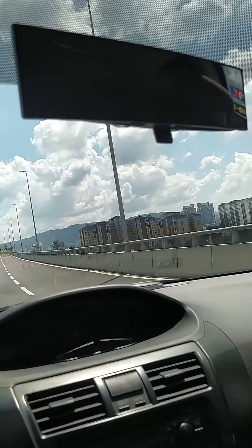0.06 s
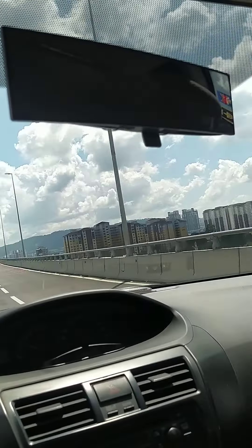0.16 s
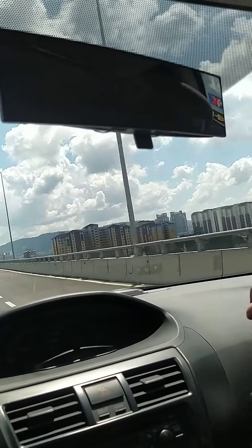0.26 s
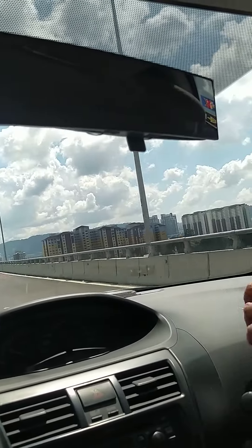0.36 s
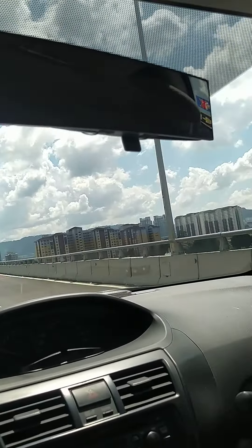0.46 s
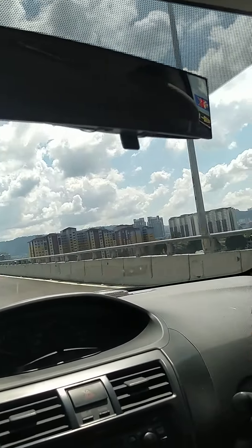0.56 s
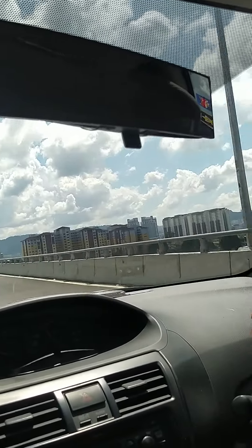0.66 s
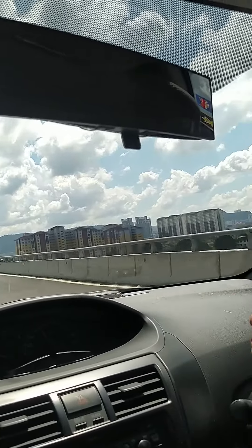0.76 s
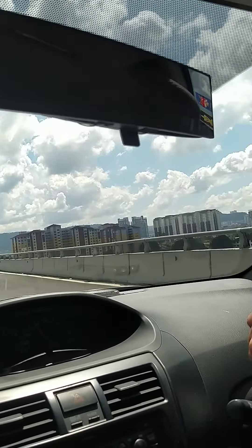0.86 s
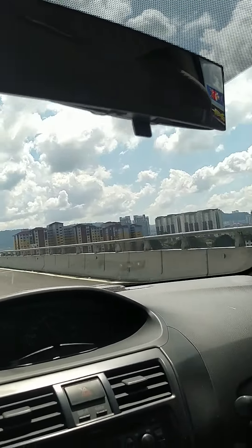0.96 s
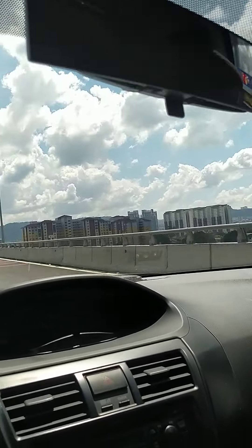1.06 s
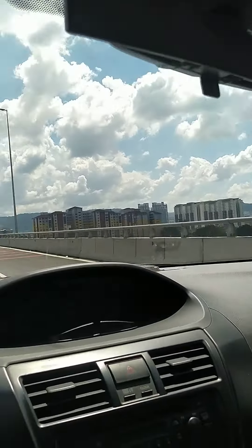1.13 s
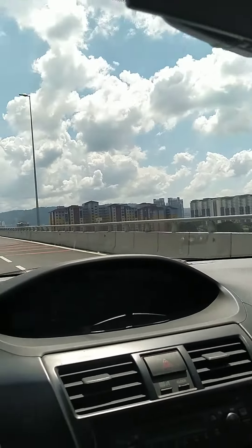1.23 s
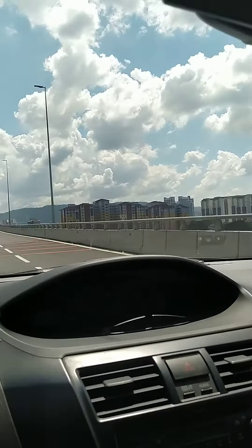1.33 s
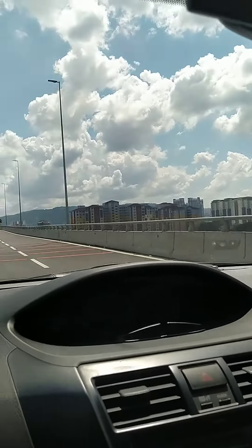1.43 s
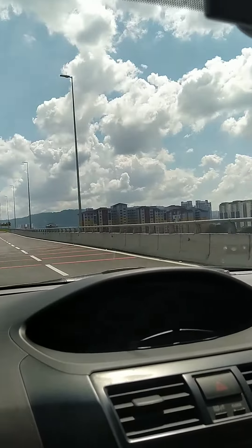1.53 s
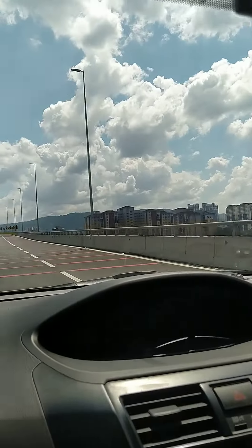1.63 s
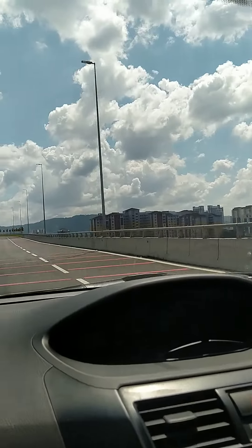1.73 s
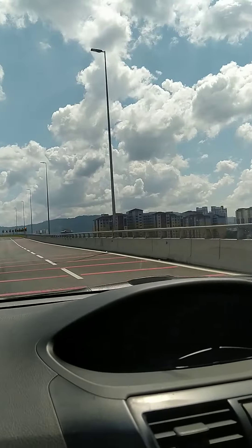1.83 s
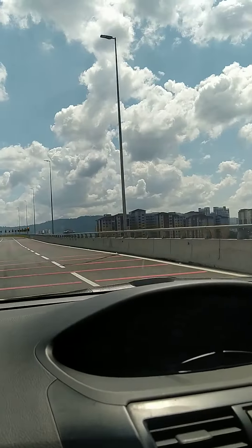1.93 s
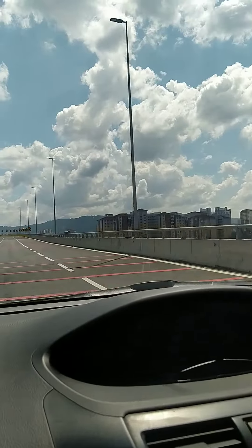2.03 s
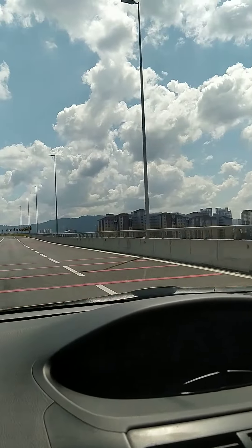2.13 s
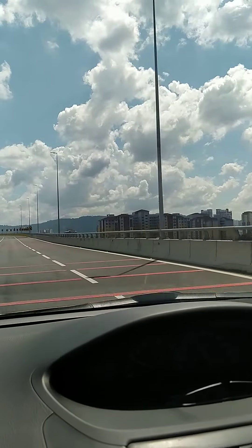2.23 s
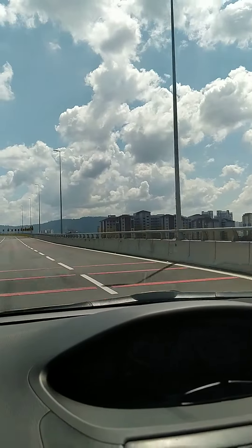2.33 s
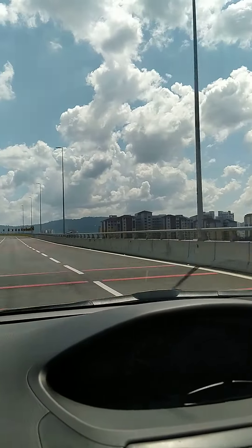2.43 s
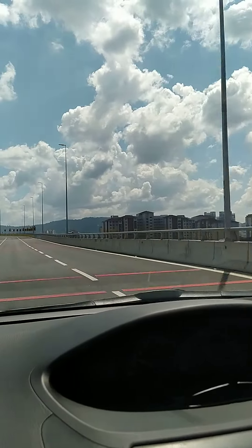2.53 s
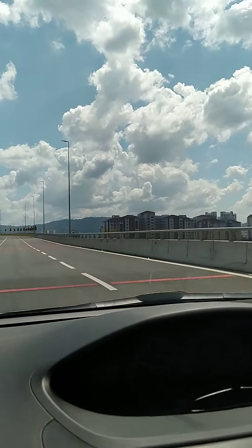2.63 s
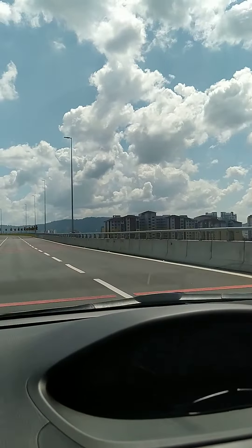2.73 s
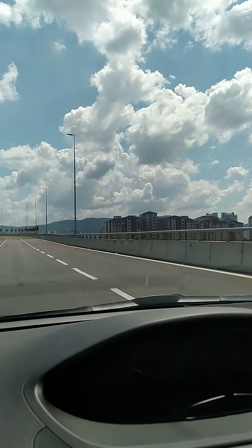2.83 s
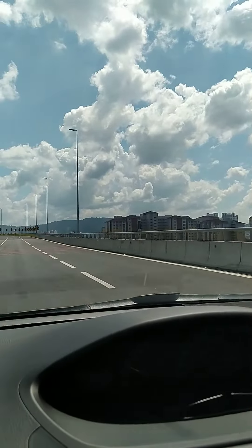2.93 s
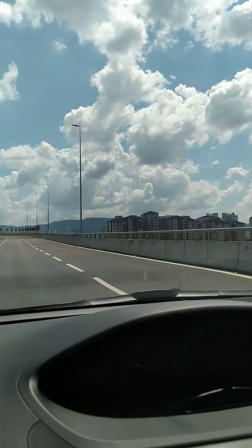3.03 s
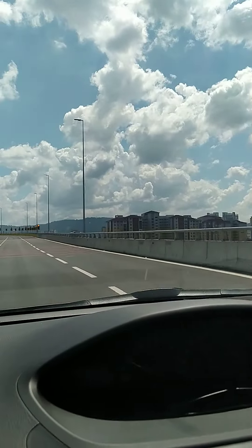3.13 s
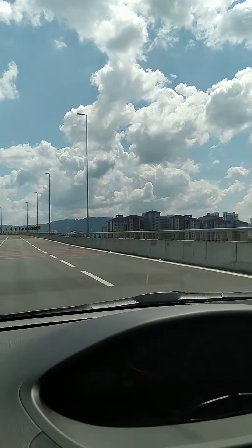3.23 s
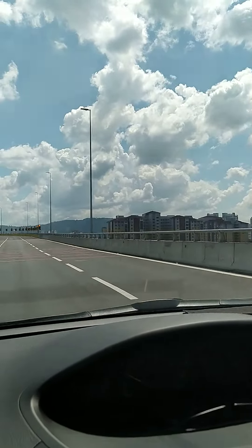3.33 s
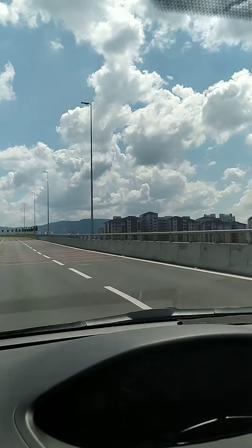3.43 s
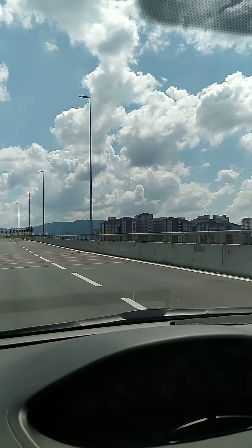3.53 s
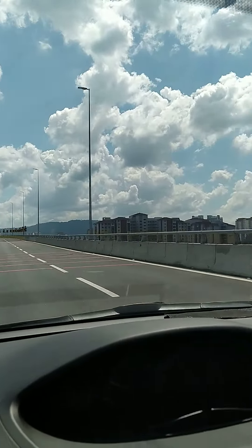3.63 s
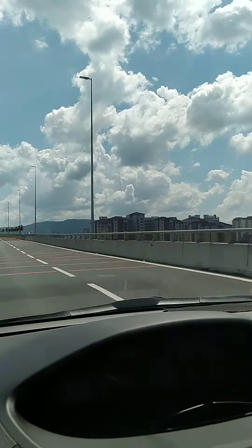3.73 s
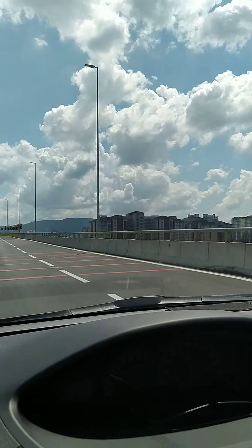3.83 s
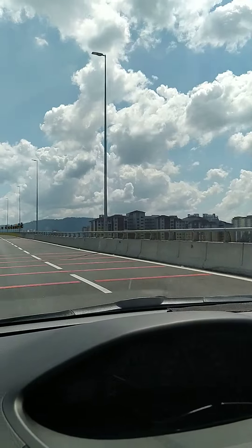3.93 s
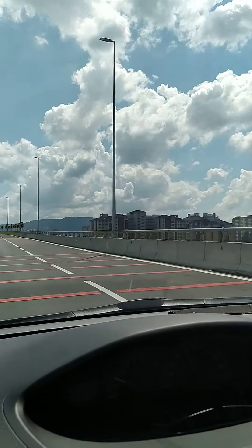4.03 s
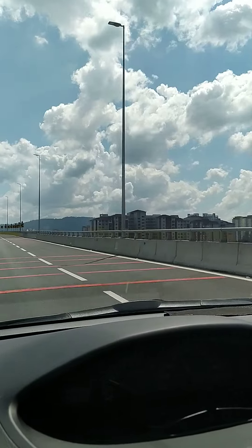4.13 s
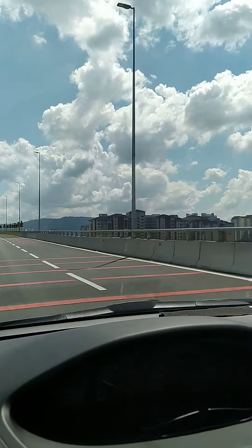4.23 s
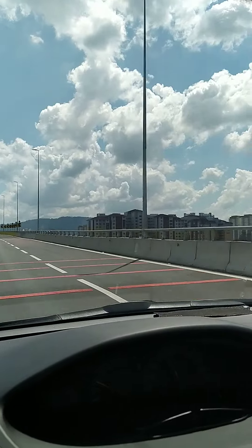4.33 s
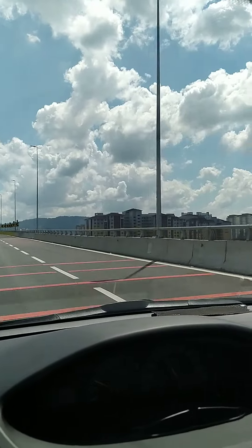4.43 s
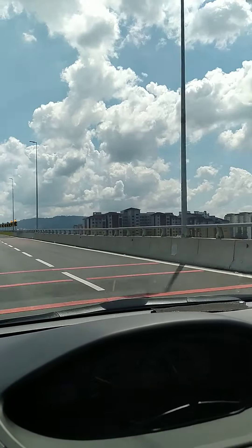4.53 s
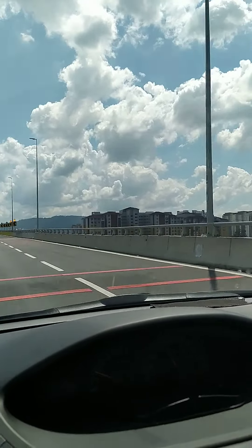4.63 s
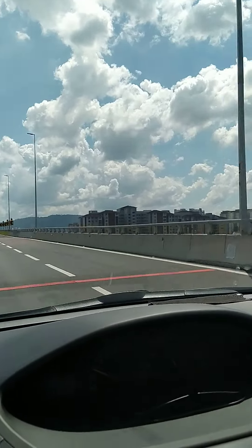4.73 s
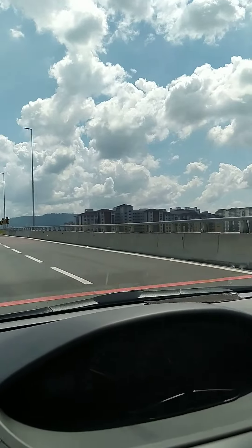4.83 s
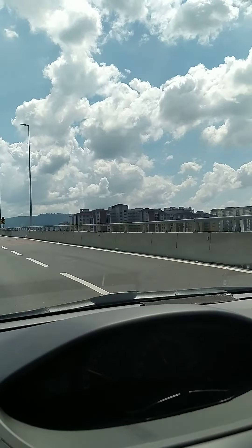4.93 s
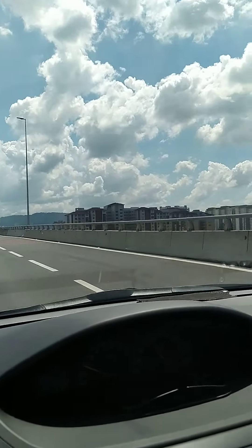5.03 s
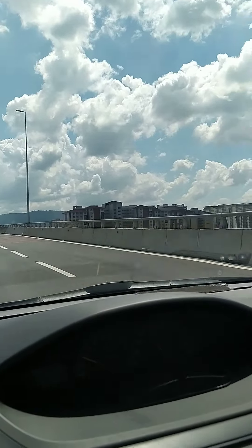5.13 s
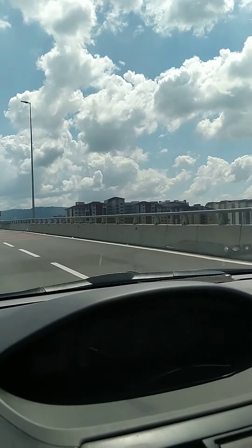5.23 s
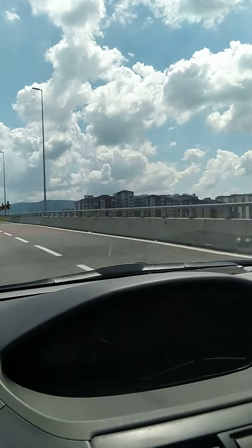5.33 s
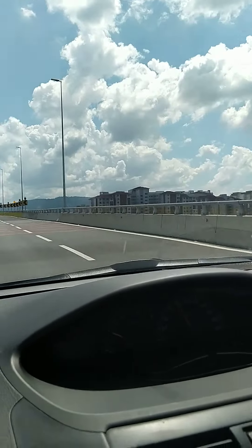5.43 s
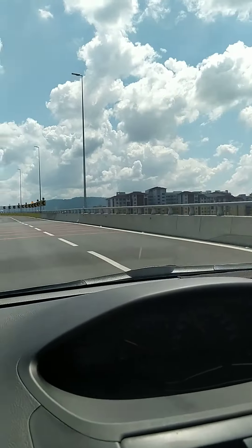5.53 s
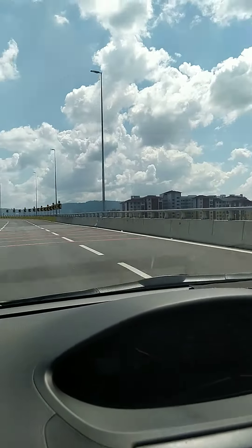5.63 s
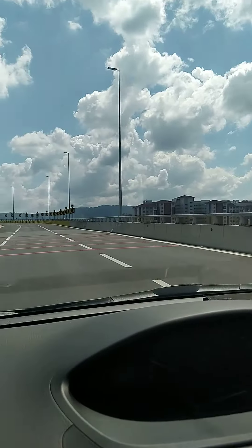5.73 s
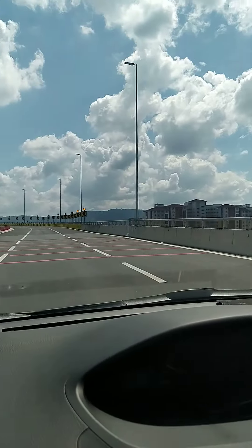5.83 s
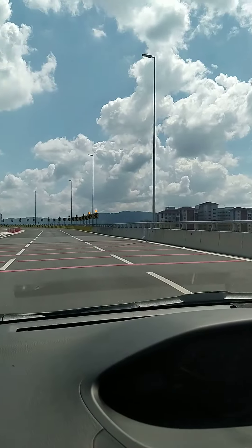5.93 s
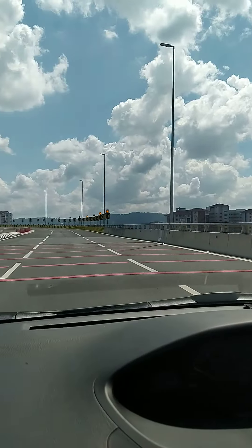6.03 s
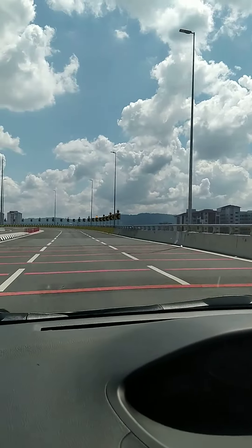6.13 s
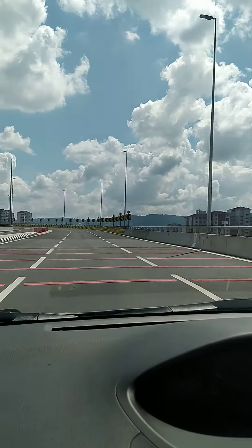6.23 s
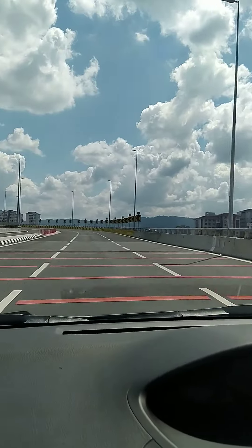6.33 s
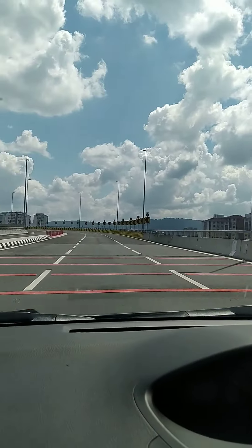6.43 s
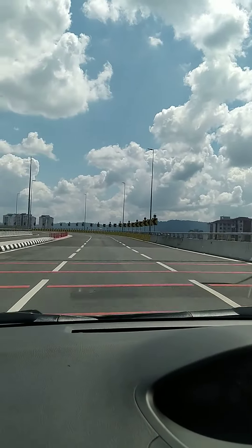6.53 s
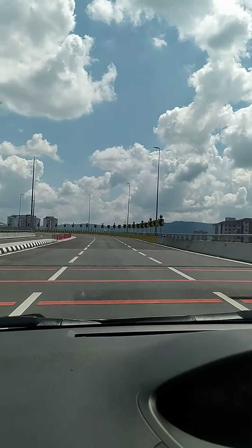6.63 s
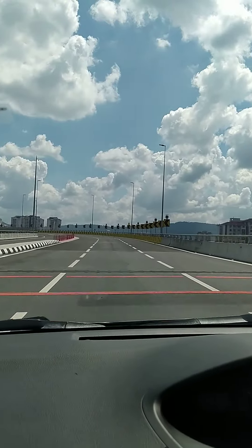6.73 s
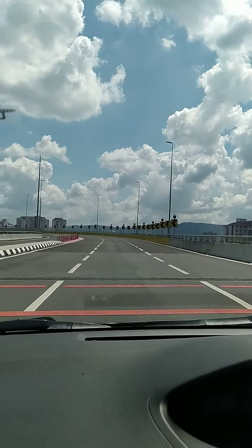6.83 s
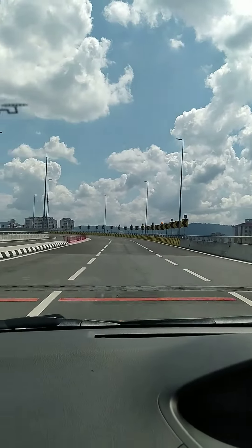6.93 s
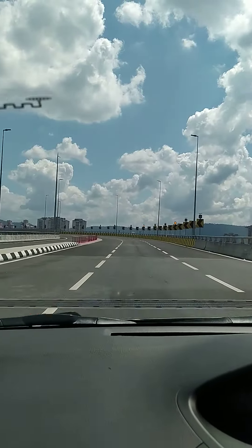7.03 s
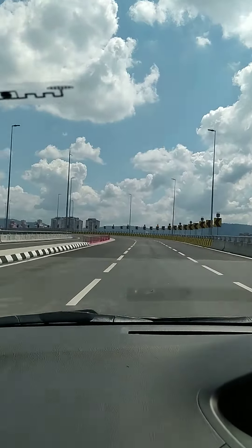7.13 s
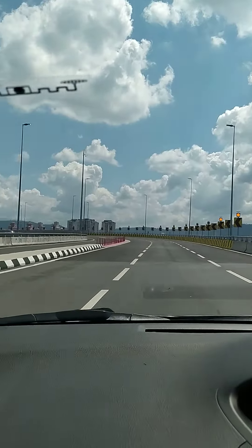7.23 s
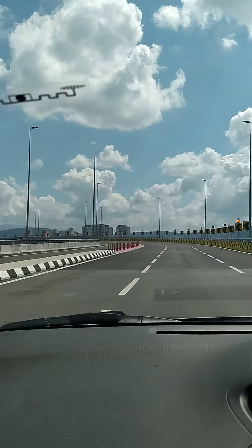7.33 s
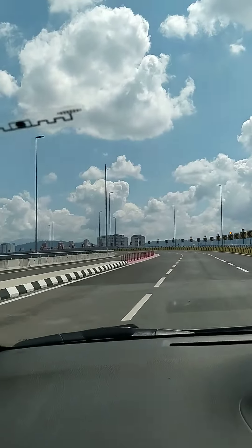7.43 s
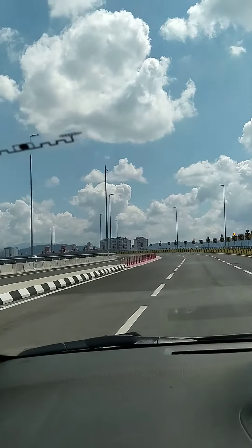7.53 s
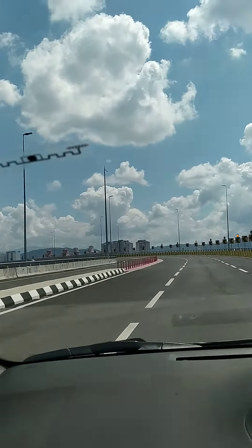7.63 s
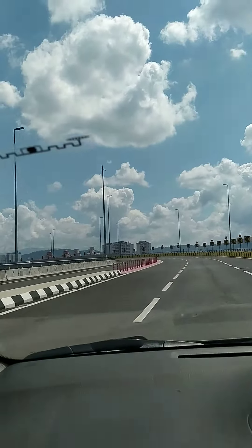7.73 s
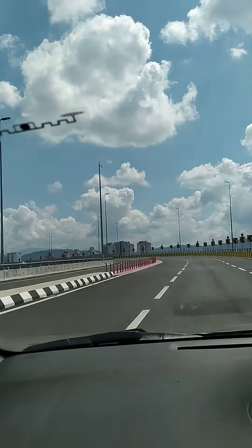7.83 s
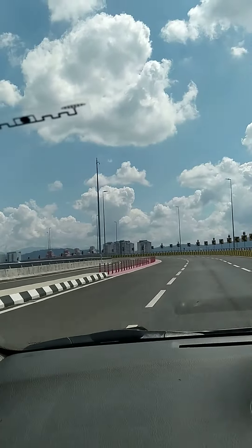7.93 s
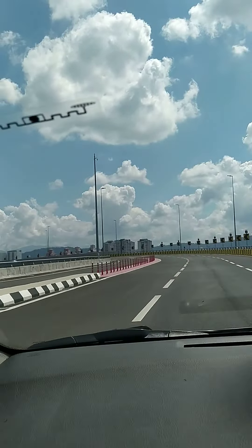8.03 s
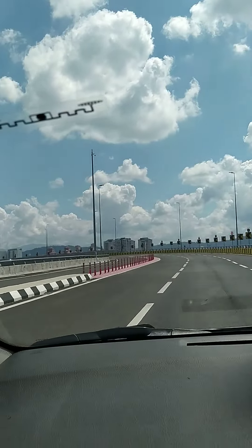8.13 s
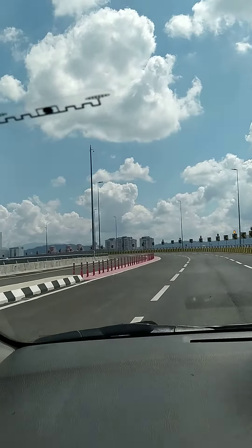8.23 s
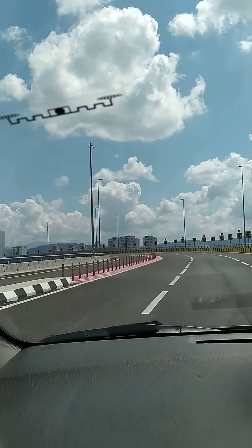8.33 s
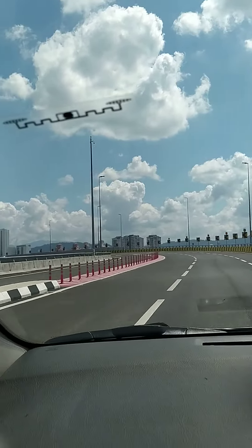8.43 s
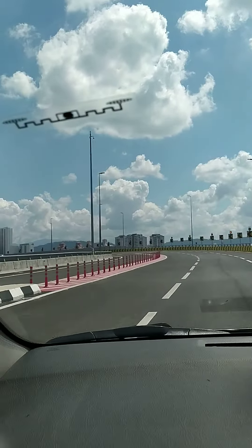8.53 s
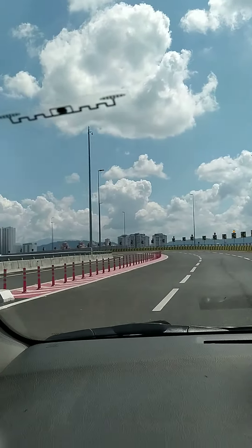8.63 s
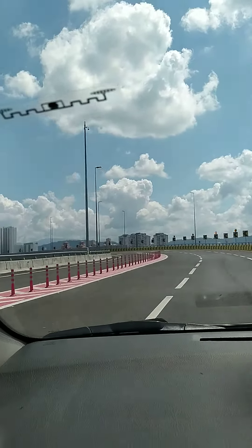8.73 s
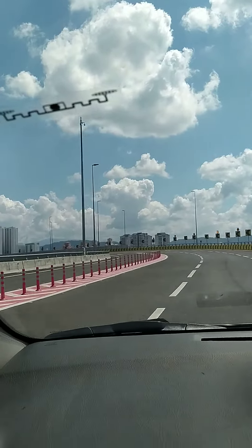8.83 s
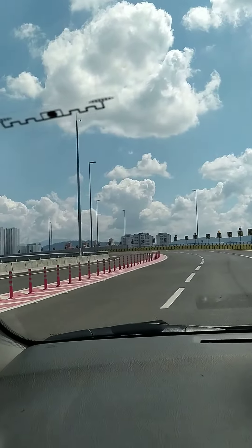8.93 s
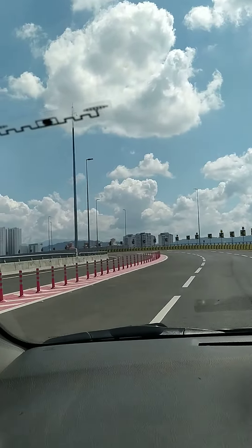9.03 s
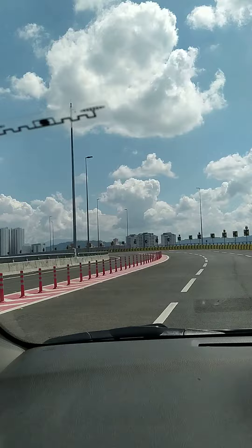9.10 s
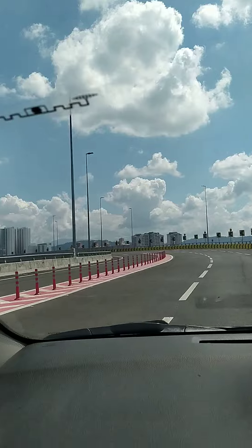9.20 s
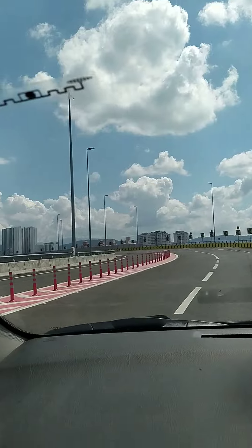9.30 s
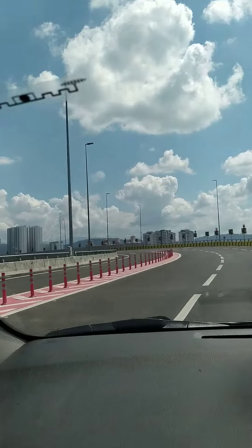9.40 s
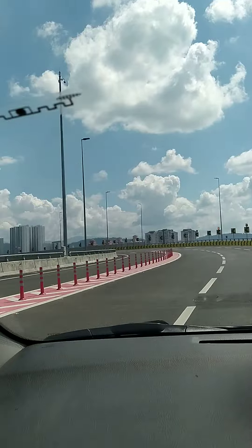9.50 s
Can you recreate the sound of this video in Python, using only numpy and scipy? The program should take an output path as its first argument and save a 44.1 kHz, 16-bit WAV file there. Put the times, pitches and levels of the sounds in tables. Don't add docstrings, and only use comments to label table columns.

```python
import sys
import numpy as np
from scipy import signal
from scipy.fft import rfft, irfft, next_fast_len
from scipy.io import wavfile
from scipy.ndimage import uniform_filter1d

SR = 44100
rng = np.random.default_rng(int(sys.argv[2]) if len(sys.argv) > 2 else 0)


def output_pcm(signal):
    pcm = np.clip(np.atleast_2d(signal).T, -1, 1) * 32767
    wavfile.write(sys.argv[1], SR, np.round(pcm).astype(np.int16))


def voltage_ratio(level):
    return 10 ** (np.asarray(level, float) / 20)


N = 421596
TIME = np.arange(N) / SR


def curve(table, column):
    rows = np.array(table)
    return voltage_ratio(np.interp(TIME, rows[:, 0], rows[:, column], left=-150, right=-150))


# (frequency [Hz], likeness [-1 to 1])
LIKENESS = [(60, 0.97), (130, 1), (290, 0.92), (640, 0.62), (1400, 0.15), (3100, 0.028), (6800, 0.1),
            (15000, -0.28)]
# (frequency [Hz], left minus right [dB])
LEAN = [(60, -0.5), (110, -1), (200, -1.0), (380, -3.5), (700, 2.5), (1290, 1.5), (2380, 1), (4400, 0.5),
        (8120, -1), (12000, -11), (15000, -18)]


def colour(spectrum, pair):
    port_lag_s = 0.00018
    size = next_fast_len(N)
    hz = np.fft.rfftfreq(size, 1 / SR)

    def at_hz(table):
        table_hz, value = np.array(table).T
        return np.interp(np.log(hz + 1), np.log(table_hz), value)

    alike = np.clip(at_hz(LIKENESS), -0.99, 0.995)
    lean = at_hz(LEAN)
    mid, side = rfft(pair, size) * voltage_ratio(at_hz(spectrum)) * np.sqrt([1 + alike, 1 - alike])
    late = np.exp(-2j * np.pi * hz * port_lag_s)
    left = (mid + side) * voltage_ratio(lean / 2) * late
    right = (mid - side) * voltage_ratio(-lean / 2)
    out = irfft(np.array([left, right]), size)[:, :N]
    return out / np.sqrt(np.mean(out ** 2))


def walk(rate):
    hold = int(SR / rate)
    steps = np.repeat(rng.standard_normal(N // hold + 1), hold)
    return 1.19 * uniform_filter1d(uniform_filter1d(steps, hold), hold)[:N]


def noise(grain_db=0., rate=3000):
    count = N // 24 + 1
    grains = np.minimum(rng.exponential(size=count), 2.5)
    grains *= rng.random(count) < rate * 24 / SR
    return rng.standard_normal((2, N)) * voltage_ratio(grain_db * np.repeat(grains, 24)[:N])


def add(out, start, shape):
    i = int(start * SR)
    out[..., i:i + shape.shape[-1]] += shape[..., :N - i]


def ring(hz, t60, rise=0., size=SR // 3):
    t = TIME[:size]
    fade = np.exp(-np.log(1000) * t / t60) * np.minimum(1, t / (rise + 1e-6))
    return fade * np.sin(2 * np.pi * hz * t) if hz else fade


def tone(hz, waver, db, flutter_db, rate):
    level = voltage_ratio(db + flutter_db * walk(rate))
    pitch = hz * (1 + waver * walk(rate))
    return level * np.sin(2 * np.pi * np.cumsum(pitch) / SR)


# (time [s], unevenness [dB], coarseness [dB])
SURFACE = [(0, -1, -2), (1, -1.5, -2.5), (1.8, -1.5, -1), (2.4, 0.5, 0.5), (3.75, 1, 1), (4.5, 0, 1),
           (5.85, 1, 1), (6.5, 0, 2.5), (7.95, -1, 0), (8.3, 1, 2.5), (8.7, 0, 6.5), (9.3, -0.2, 4),
           (9.56, 1.5, 5.5)]
# (frequency [Hz], level [dB per Hz])
RUMBLE = [(7.1, -35), (12, -2), (32, 0.5), (43, 4), (60, -3.5), (76, -8), (108, -2), (124, -3), (145, -5),
          (181, -3), (210, -7.5), (246, -6.5), (312, -15), (361, -16), (400, -17.5), (520, -39),
          (880, -120)]
ROAR = [(180, -28.5), (300, 4), (322, -15.5), (365, -2), (584, -7), (782, -9), (855, -12), (1020, -12.5),
        (1220, -15), (1660, -18), (2500, -32.5), (3250, -42), (5500, -120)]
WHOOSH = [(200, -90), (600, -12.5), (760, 2.5), (1030, -1.5), (1500, -17), (2600, -46), (5000, -120)]


def road():
    swell, coarse = walk(1.11), curve(SURFACE, 2)
    rumble_level = curve(SURFACE, 1) * voltage_ratio(-27.5 + 0.058 * swell + 0.5 * walk(4.02))
    roar_level = coarse ** 0.54 * voltage_ratio(-38.5 + 0.37 * swell + 0.5 * walk(14))
    rumble = colour(RUMBLE, noise()) * rumble_level
    roar = colour(ROAR, noise()) * roar_level
    whoosh = colour(WHOOSH, noise()) * coarse * voltage_ratio(-48)
    return rumble + roar + whoosh


# (frequency [Hz], level [dB per Hz])
HISS = [(1060, -40), (1800, -1.5), (1900, -2), (2010, -0.5), (3440, -10), (4050, -9), (5500, -13.5),
        (9700, -8), (11600, -25), (13500, -26), (14400, -41), (15000, -46), (15500, -61)]


def vent():
    return colour(HISS, noise()) * curve(SURFACE, 1) ** 0.35 * voltage_ratio(-50 + 0.19 * walk(16))


def tyre_air():
    return tone(247.6, 0.01165, -46, 3.9, 11)


# (time [s], firing rate [Hz], load [dB])
ENGINE = [
    (0, 59.33, -12),
    (.8, 61.7, -4.5),
    (1.5, 60.6, 0),
    (2.4, 62.43, 1.5),
    (3, 61.8, -19),
    (6, 61.42, -4.5),
    (8, 59.63, -2.5),
    (8.6, 58.83, 1),
    (9.56, 58.9, -4),
]
# (multiple of firing rate [-], level [dB])
ORDERS = [(1, -35), (2, -32), (3, -35), (4, -46.5), (5, -52.5)]


def engine():
    firing = np.interp(TIME, *np.array(ENGINE)[:, :2].T)
    return curve(ENGINE, 2) * sum(tone(k * firing, 0.003, db, 1.5, 5) for k, db in ORDERS)


# (time [s], pitch [Hz], level [dB])
WHINE = [(0, 799, -59), (.22, 793, -67), (.42, 780, -53), (.62, 790, -48), (.72, 792, -56), (.85, 795, -51),
         (1.4, 803, -44.5), (1.7, 803, -45.5), (1.92, 810, -47), (2.05, 802, -46), (2.4, 807, -62)]
# pitch [Hz], centre [s], half length [s], level [dB]
GEAR_MATE = (668, 1.77, .09, -49)


def gear_whine():
    pitch = np.interp(TIME, *np.array(WHINE)[:, :2].T)
    whine = curve(WHINE, 2) * tone(pitch, 0.013, 0.5, 2.5, 70)
    hz, centre, half, db = GEAR_MATE
    return whine + tone(hz, 0.006, db, 2, 30) * np.exp(-((TIME - centre) / half) ** 2)


def stroke_level(table):
    level = np.zeros(N)
    for *times, db in table:
        corners = np.c_[np.cumsum(times), db - 32 * np.array([1, 0, 0, 1])]
        level += curve(corners, 1)
    return level


# (time [s], rise [s], hold [s], fall [s], level [dB])
STROKES = [
    (0, .01, 0.26, 0.11, -52),
    (.02, .03, 0.0033, 0.027, -46),
    (0.067, 0.016, .003, 0.017, -44),
    (4.088, 0.049, 0.059, .02, -46),
]
# (time [s], rise [s], hold [s], fall [s], level [dB])
FLICKS = [
    (6.53, 0.03, 0.015, .01, -44),
    (6.571, 0.0073, 0.013, 0.034, -29.5),
    (6.603, 0.003, 0.0032, 0.017, -32),
    (7.189, 0.045, .006, 0.063, -37),
]
# (frequency [Hz], level [dB per Hz])
SLEEVE = [(1500, -40), (3000, -11), (4800, -6.5), (6300, -4), (8800, -0.5), (10200, -3), (11200, -12),
          (13800, -16), (14600, -40), (15500, -45)]
CUFF = [(1470, -45), (2500, -12), (3500, -7), (4440, -4), (5200, -14), (6300, -28), (7900, -1), (9600, 3),
        (10600, -10), (11700, -14), (12600, -30), (14900, -23), (15700, -40)]


def sleeve():
    brush = colour(SLEEVE, noise(2.1, 400)) * stroke_level(STROKES)
    return brush + colour(CUFF, noise(2.1, 400)) * stroke_level(FLICKS)


# (time [s], peak [dB], ring pitch [Hz], ring t60 [s], ring level [dB])
TICKS = [
    (0.08, -37, 1560, 0.06, -15),
    (1.0394, -47, 1500, 0.06, -17),
    (3.918, -47, 8970, .02, 6),
    (6.5304, -48, 1533, 0.093, 3),
    (6.6055, -26, 2990, 0.056, -2),
    (6.6068, -25.5, 6050, 0.015, -4),
    (6.6068, -41.5, 1550, 0.03, 6),
    (9.4163, -42, 2000, 0.013, 10),
    (9.418, -48, 1500, .02, 8),
]
# (frequency [Hz], level [dB per Hz])
SNAP = [(300, -30), (800, 0), (2510, -2), (3030, 3), (4600, -2), (5980, -7), (6820, -19), (9860, 2),
        (12000, -18), (15400, -18)]


def ticks():
    crack, ping = np.zeros((2, N))
    for start, db, hz, t60, ring_db in TICKS:
        add(crack, start, voltage_ratio(db + 4.5) * ring(0, 0.012, 0.00044))
        both = ring(hz, t60, 0.00058) + 0.2 * ring(0.72 * hz, t60 / 2, 0.0011)
        add(ping, start, voltage_ratio(db + ring_db) * both)
    return colour(SNAP, noise()) * crack + ping


# (time [s], peak [dB], ring pitch [Hz], leaving slap [dB], panel shake [dB])
SLAPS = [(2.454, -17.5, 730, -4, -25), (2.613, -19, 760, -2, -39), (2.772, -14.5, 777, -4, -30),
         (2.929, -14.5, 736, -10, -32), (3.085, -18.5, 766, -11, -24), (3.244, -24, 695, 7, -28),
         (4.546, -16.5, 738, -14, -25), (4.702, -17, 735, -20, -26), (4.86, -18, 746, -8, -27),
         (5.017, -22.5, 662, 6, -23), (5.173, -19, 727, -6, -27), (5.329, -21, 680, -12, -36),
         (6.641, -22.5, 680, -15, -25.5), (6.797, -19, 640, -4, -26), (6.951, -21, 684, 3, -25),
         (7.106, -19, 704, -8, -41), (7.264, -25, 674, -7, -33), (7.423, -29, 684, -4, -33)]
# (time [s], peak [dB], ring pitch [Hz])
THUMPS = [(2.724, -23, 800), (2.874, -27, 764), (3.195, -30, 800), (3.285, -18, 894), (3.322, -24, 860),
          (3.357, -24, 780), (3.438, -27, 740), (4.902, -21, 800), (4.941, -23, 710), (4.973, -28, 774),
          (5.351, -18, 710), (5.524, -29, 790), (7.29, -19, 740), (7.442, -23, 700), (7.498, -20, 774),
          (7.522, -25, 804), (7.568, -26, 720)]


def slaps():
    out = np.zeros((2, N))
    for start, db, hz, leave_db in [row[:4] for row in SLAPS] + [(*row, -60) for row in THUMPS]:
        left = ring(hz, 0.045, 0.00031) + 0.5 * ring(hz * 1.144, 0.038, 0.0078)
        right = 0.49 * ring(hz, 0.08, 0.00065) - 0.16 * ring(hz * 1.19, 0.11, 0.0015)
        tread = np.array([left, right])
        add(out, start, voltage_ratio(db) * tread)
        add(out, start + 0.031, voltage_ratio(db + leave_db) * tread)
    return out


RIDGES = [2.59, 2.7479, 2.9061, 3.0638, 3.2209, 3.3778, 4.6799, 4.8374, 4.9939, 5.1509, 5.307, 5.4643,
          6.7685, 6.9254, 7.0824, 7.2394, 7.3958, 7.5529]
AXLE_LAG_S, RIDGES_PER_SET = 0.1349, 6
# (frequency [Hz], level [dB per Hz])
FLOOR = [(40, -8), (62, -0.5), (76, -1), (88, -10.5), (101, 1), (135, -1.5), (155, -3), (172, -1),
         (192, 0.5), (222, -10), (244, -3), (290, -11), (400, -18), (850, -120)]
PANELS = [(180, -38), (300, -6), (414, -2.5), (519, -7), (754, -6), (825, -11.5), (917, -12), (1080, -16.5),
          (1480, -23.5), (1800, -24), (2340, -28.5), (3960, -120)]


def shudder():
    kick, hum, shake = np.zeros((3, N))
    front_panel = ring(0, 0.28, 0.01)
    rear_panel = voltage_ratio(-24.5) * ring(0, 0.71, 0.033)
    for start, slap in zip(RIDGES, SLAPS):
        add(kick, start, ring(0, 1.01, 0.027, size=SR) * voltage_ratio(0.96 * rng.standard_normal()))
        add(kick, start - AXLE_LAG_S + 0.0232, 1.35 * ring(0, 0.41, 0.0071, size=SR))
        add(hum, start + 0.041, voltage_ratio(-26.5) * ring(101, 1.5, 0.011, size=SR))
        add(shake, slap[0], (voltage_ratio(slap[-1]) * front_panel) ** 2)
        add(shake, start + 0.0017, rear_panel ** 2)
    floor = colour(FLOOR, noise()) * kick * voltage_ratio(-22.5)
    return hum + floor + colour(PANELS, noise(4.3, 300)) * np.sqrt(shake)


# (pitch [Hz], t60 [s], then signed push [-] of rear climb, rear drop,
# front climb, front drop)
BODY = [(21.3, 0.51, -0.017, -0.145, -0.072, 0.033), (27.0, 0.68, 0.007, 0.336, 0.081, -0.036),
        (38.0, 0.83, 0.171, 0.024, -0.087, -0.068), (49.7, 0.45, -0.153, -0.041, 0.036, -0.05),
        (76.0, 0.56, -0.119, 0.019, -0.007, -0.013), (89.8, 0.21, -0.085, -0.106, -0.029, -0.021),
        (106.9, 0.17, 0.172, 0.02, 0.011, -0.011), (154.0, 0.42, 0.0, -0.085, 0.011, 0.011),
        (188.8, 0.24, 0.001, 0.061, 0.051, -0.02), (241.3, 0.48, -0.003, -0.044, -0.011, -0.017)]
# (pitch [Hz], t60 [s], level [dB])
REBOUND = [(65.4, 0.55, -20.5), (101.4, 1.23, -29), (152.2, 0.36, -19), (186, 0.58, -34)]


def body():
    ridge_s, rebound_s = 0.0376, 0.12
    lags = (0, ridge_s, -AXLE_LAG_S, ridge_s - AXLE_LAG_S)
    blows = sum(np.array(push)[:, None] * ring(hz, t60, size=SR) for hz, t60, *push in BODY)
    bounce = sum(voltage_ratio(db) * ring(hz, t60, 0.02, size=SR) for hz, t60, db in REBOUND)
    out = np.zeros(N)
    for start in RIDGES:
        for blow, lag in zip(blows, lags):
            add(out, start + lag, blow * voltage_ratio(0.8 * rng.standard_normal()))
    for start in RIDGES[RIDGES_PER_SET - 1::RIDGES_PER_SET]:
        add(out, start + rebound_s, bounce)
    return out * voltage_ratio(1.37)


# (time [s], peak [dB], t60 [s], brightness [dB])
RATTLES = [(2.4787, -29, 0.28, 8), (2.6323, -10.5, 0.15, -2), (2.6528, -14, 0.087, 8.5),
           (2.6833, -22.5, 0.48, -2), (2.793, -12, 0.24, -1.5), (2.9457, -21, 0.12, 5),
           (2.963, -20.5, 0.38, -4), (3.1073, -11.5, 0.11, -3), (3.1258, -27, 0.41, 1),
           (3.265, -10, 0.15, 0), (3.2824, -10.5, 0.14, 4.5), (3.3064, -12.5, 0.21, -3),
           (3.4206, -15, 0.3, 0.5), (4.7423, -25.5, 0.21, 5.5), (4.88, -17, 0.19, -1),
           (4.898, -21, 0.41, 0), (5.041, -13, 0.18, 4), (5.0861, -27, 0.14, -3), (5.1943, -29, .18, 8),
           (5.2123, -31, 0.31, 9), (5.363, -19.5, 0.32, 3), (5.5071, -25, 0.1, 0), (5.5205, -15.5, 0.31, 0),
           (6.8147, -16.5, 0.19, 3.5), (6.982, -20.5, 0.16, 4.5), (7.1267, -14.5, 0.28, 1),
           (7.281, -16, 0.25, -1), (7.437, -11, 0.066, -9), (7.457, -19.5, 0.36, -3),
           (7.605, -20, 0.29, -0.5), (2.6, -27, .2, -6), (2.87, -36, 0.17, -6), (3.165, -32, 0.16, -2),
           (3.195, -32, 0.18, 2), (3.35, -24.5, 0.2, 2), (4.69, -30.5, .4, -2), (4.79, -32, .2, -8),
           (5.115, -33, .2, 2), (6.672, -24, .12, 0), (6.79, -23, 0.11, 3), (7.02, -32, .15, 6),
           (7.148, -26, 0.18, 8), (7.32, -32, 0.15, 4), (7.365, -30, 0.17, 5)]
# (lag [s], peak [dB], t60 [s], brightness [dB], scatter [dB])
SHIVERS = [
    (0.028, -22.5, 0.34, 5, -1),
    (0.13, -26.5, 0.15, -4, 0.9),
    (0.11, -31, 0.12, 9, -3),
]
# (frequency [Hz], level [dB per Hz])
TRIM = [(590, 0.5), (1000, 0), (1080, 0.5), (1480, 3), (1590, -1), (1900, -5.5), (2200, -0.5), (3330, -9),
        (4500, -26), (5850, -45), (9900, -120)]
BUZZ = [(2350, -26), (4000, 4), (5310, 3), (7050, 3), (9360, 6), (11200, -7.5), (13600, -21), (14800, -40),
        (15500, -34)]
# (pitch [Hz], level [dB])
TRIM_MODES = [(1490, -9.5), (1670, -29), (2130, -11), (2810, -9), (4050, -10), (6240, -18), (8130, -31),
              (8900, -7.5), (9610, -22.5), (10070, -14)]


def rattles():
    bursts = []
    for k, start in enumerate(RIDGES):
        for j, (lag, db, t60, bright_db, scatter_db) in enumerate(SHIVERS):
            lone_db = -9 * ((k + (j > 0)) % RIDGES_PER_SET == 0)
            peak_db = db + scatter_db * rng.standard_normal() + lone_db
            bursts.append((start + lag, peak_db, t60, bright_db, 0.035))
    bursts += [(*row, 0.015) for row in RATTLES]

    dull, bright, rings = np.zeros((3, 2, N))
    for start, db, t60, bright_db, rise in bursts:
        pan_db = -1.25 * rng.standard_normal() * np.array([[1], [-1]])
        gain = voltage_ratio(db + pan_db)
        burst = ring(0, max(t60, 0.02), rise) * gain
        add(dull, start - 0.6 * rise, burst * voltage_ratio(-12.0))
        add(bright, start - 0.59 * rise, burst * voltage_ratio(bright_db - 22.5))
        for (hz, mode_db), chance in zip(TRIM_MODES, rng.standard_normal((len(TRIM_MODES), 4))):
            push = gain * voltage_ratio(mode_db) * 0.67 * np.tanh(chance[:2, None])
            mode = ring(hz * (1 + 0.036 * chance[3]), 2.0 / np.sqrt(hz), 0.0045, size=2500)
            add(rings, start + 0.006 * abs(chance[2]), push * mode)
    chatter = noise(2.8, 400) * voltage_ratio(0.7 * walk(40))
    dull *= colour(TRIM, chatter) * voltage_ratio(2.43 * walk(130))
    bright *= colour(BUZZ, chatter) * voltage_ratio(2.43 * walk(130))
    return dull + bright + rings


# (time [s], peak [dB], treble minus peak [dB])
KNOCKS = [(2.614, -23, -7), (2.6325, -28, -13), (2.6524, -23, -13), (2.6833, -34, -18), (2.7122, -27.5, -9),
          (2.7646, -40, -7), (2.792, -20, 2.5), (2.8091, -19, -9), (2.8294, -32, -17), (2.9284, -31, -14),
          (2.9514, -20, -12), (2.9644, -24.5, -1), (2.9994, -35, -14), (3.034, -24, -11),
          (3.0854, -28, -16), (3.1073, -26, -13), (3.125, -18.5, -2.5), (3.1944, -36, -7), (3.243, -22, -6),
          (3.264, -22, -9), (3.29, -17, -14), (3.3069, -28, -16), (3.353, -20, -15), (3.4215, -28, -15),
          (4.7426, -42, -9), (4.8589, -34, -10), (4.8798, -24, -14), (4.8984, -18, -6), (4.9404, -38, -10),
          (4.972, -19, -15), (5.0364, -16, -9), (5.0564, -25, -14), (5.0863, -35, -13), (5.1914, -38, -10),
          (5.2106, -17, -10), (5.2764, -22, -16), (5.3293, -23, -13), (5.35, -28, -9), (5.3635, -20, -9),
          (5.5116, -20, -7), (5.5214, -22, -5), (6.789, -32, -8), (6.8154, -24, -12), (6.9431, -38, -16),
          (6.967, -23, -16), (6.9814, -18, -7), (7.041, -26, -6), (7.104, -26, -9), (7.1247, -22, -20),
          (7.2807, -19, -15), (7.369, -30, -10), (7.4175, -30, -13), (7.4365, -29, -12),
          (7.4585, -17.5, -1.5), (7.5752, -30, -17), (7.6094, -24, -12)]


def knocks():
    size, rise_s, port_lag_s = 4000, 0.006, 0.00027
    thud, dull, sharp = (colour(part, noise(4.7, 600))[0] for part in (PANELS, TRIM, BUZZ))
    fade = ring(0, 0.066, rise_s, size=size)
    out = np.zeros((2, N))
    chances = rng.uniform(-1, 1, (len(KNOCKS), 1 + 2 * len(TRIM_MODES)))
    for (start, db, treble_db), (side, *chance) in zip(KNOCKS, chances):
        start = start - rise_s / 2
        i = int(start * SR)
        at = slice(i, i + size)
        knock = fade * (voltage_ratio(-6.5) * thud[at] + voltage_ratio(-5.5) * dull[at] + voltage_ratio(treble_db - 5) * sharp[at])
        for (hz, mode_db), push, shift in zip(TRIM_MODES, chance[::2], chance[1::2]):
            mode = ring(hz * (1 + 0.049 * shift), 0.055, 0.0028, size=size)
            knock += voltage_ratio(mode_db - 3) * push * mode
        add(out[0], start + port_lag_s * max(side, 0), voltage_ratio(db) * knock)
        add(out[1], start + port_lag_s * max(-side, 0), voltage_ratio(db) * knock)
    return out


def scene():
    cruise = road() + vent() + tyre_air() + engine() + gear_whine()
    by_hand = sleeve() + ticks()
    ridges = slaps() + shudder() + body() + rattles() + knocks()
    return cruise + by_hand + ridges


def top_cut(x):
    return signal.sosfilt(signal.butter(12, 15450, fs=SR, output="sos"), x)


def record(dry):
    mix = np.tanh(1.255 * dry) / 1.314
    return top_cut(mix)


dry = scene()
out = record(dry)
output_pcm(out)
```